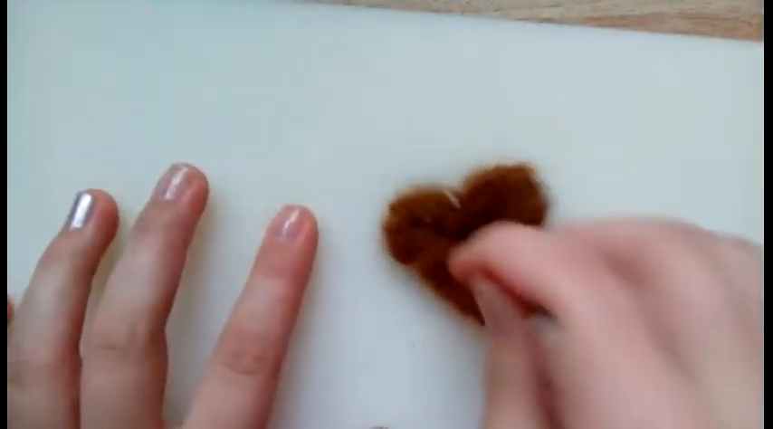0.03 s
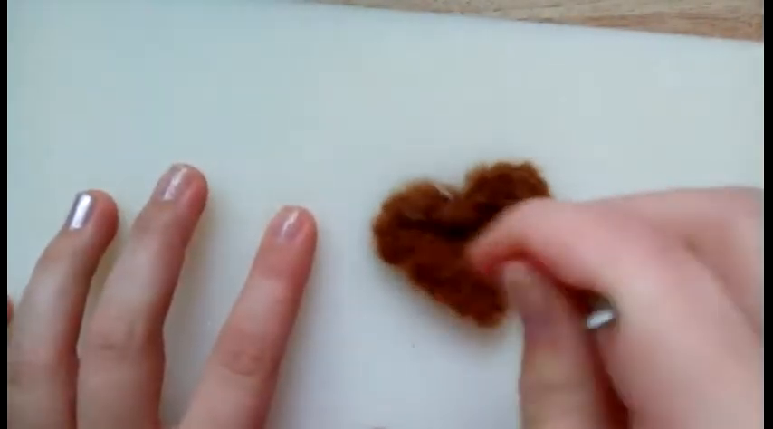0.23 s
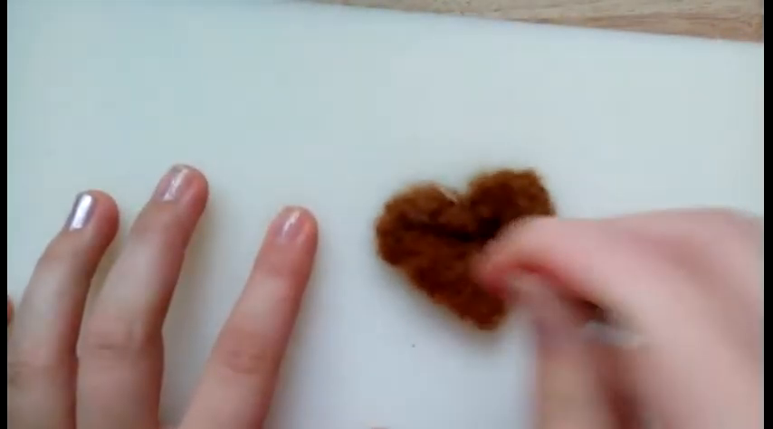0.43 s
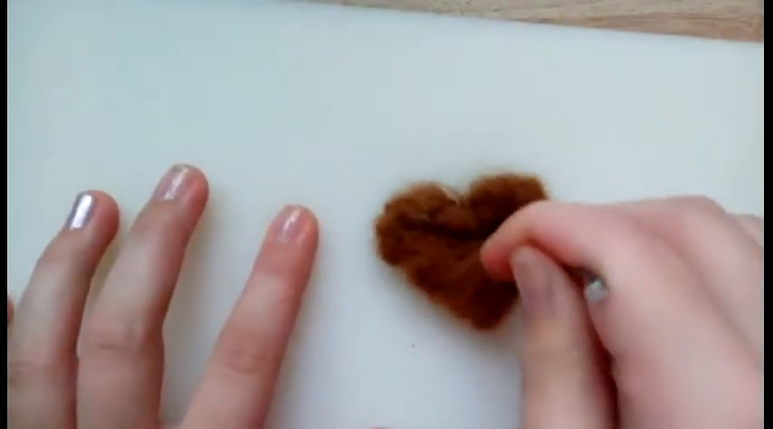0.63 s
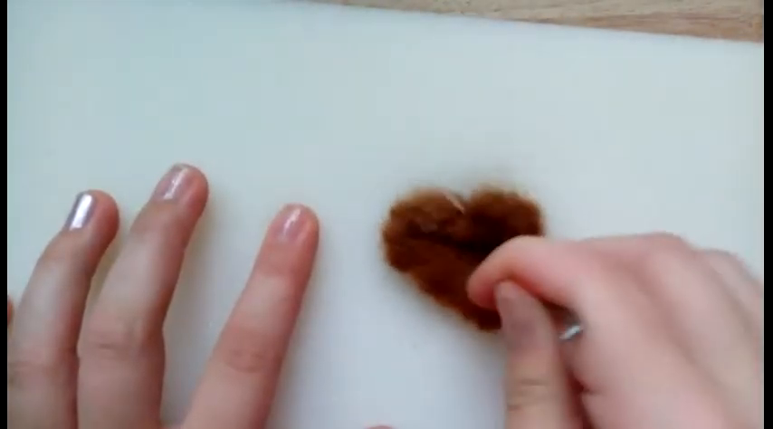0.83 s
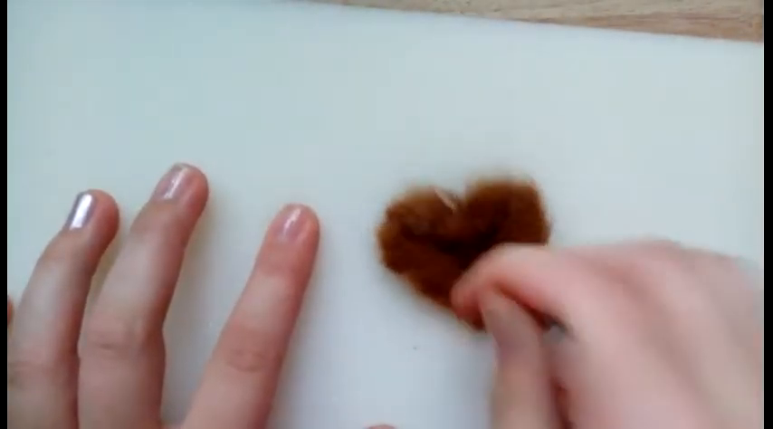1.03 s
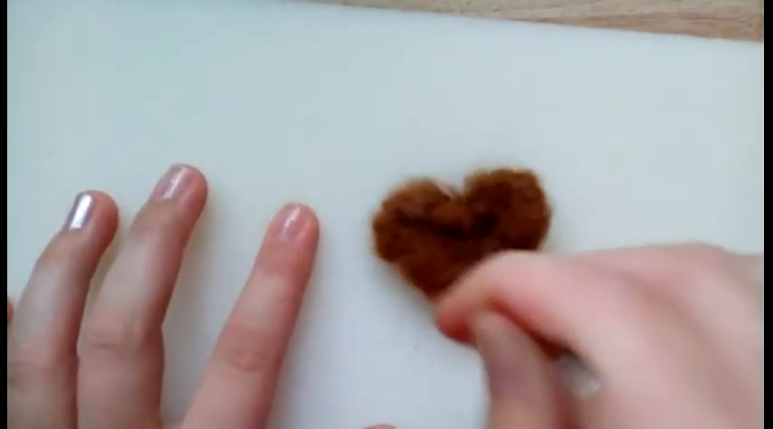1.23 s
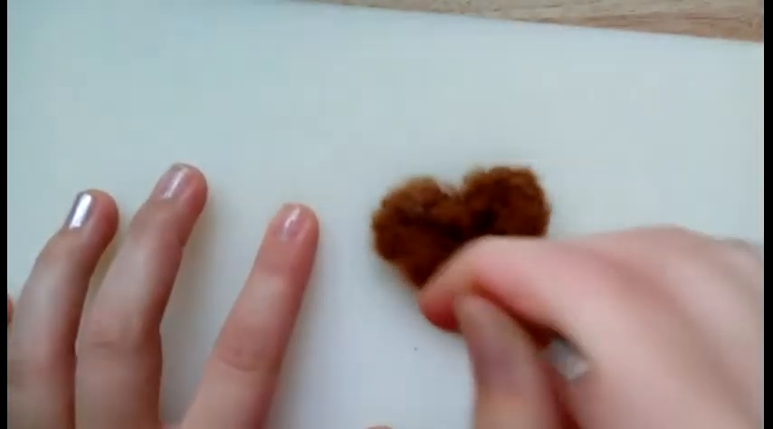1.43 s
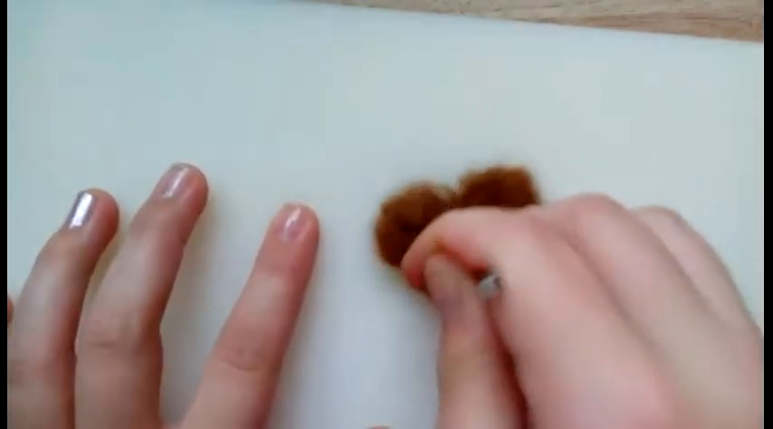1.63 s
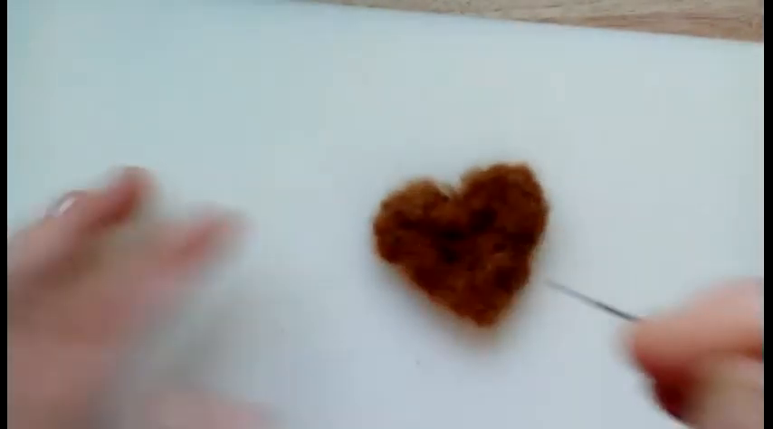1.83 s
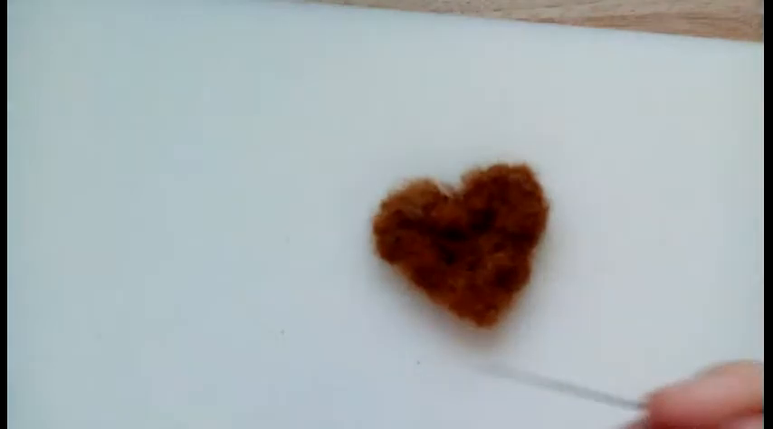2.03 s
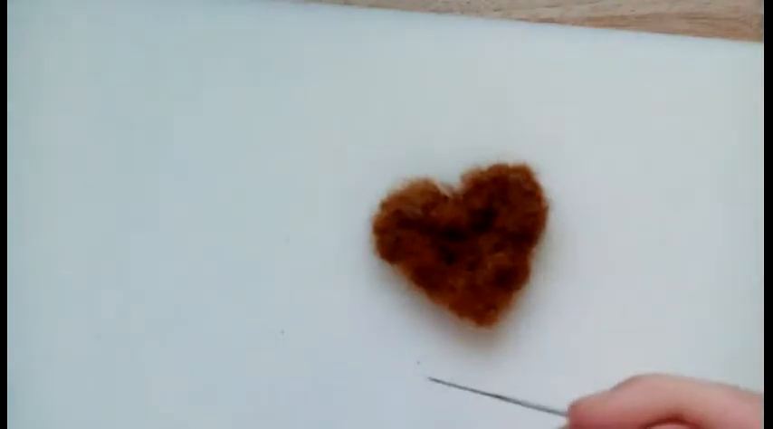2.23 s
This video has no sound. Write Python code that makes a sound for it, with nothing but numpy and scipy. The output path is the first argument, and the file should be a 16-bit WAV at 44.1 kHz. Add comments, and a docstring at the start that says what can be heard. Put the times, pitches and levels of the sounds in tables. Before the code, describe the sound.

A felting needle stabs wool on a foam pad about four times a second, eight crunchy blows with deep table thumps, faint rasps between as it pulls out, then quiet; close microphone, small quiet room with hiss.

```python
"""A barbed felting needle stabs four times a second through wool into a foam pad on a table, miked close.
Each stab rustles as swelling noise in the wool and crunches as ringing foam grains and clicks in the pad.
Decaying modes thump the table; grains rasp on the way out, with pings as the tip springs free.
A short room answer, a quiet room's murmur and microphone hiss lie around it; the hardest blows clip."""
import sys
import numpy as np
from scipy import signal
from scipy.fft import rfft, irfft, next_fast_len
from scipy.io import wavfile
from scipy.ndimage import map_coordinates

SR = 44100
rng = np.random.default_rng(int(sys.argv[2]) if len(sys.argv) > 2 else 0)


def put_to_file(sound):
    """Save the sound as 16-bit audio at rate SR, in the file named by the first command-line argument."""
    columns = np.atleast_2d(sound).T  # one column per channel
    safe = np.clip(columns, -1, 1)
    whole_steps = np.round(safe * 32767)
    wavfile.write(sys.argv[1], SR, whole_steps.astype(np.int16))


N = 100283
T = np.arange(N) / SR

# strokes through wool into foam: (time [s], length [s], crunch level [dB], change over the stroke [dB],
# wool level [dB], rise of the crunch [s], treble gain [dB], room answer [dB])
STABS = [(-.012, 0.066, -20, -24, -16.5, 0.0018, 3, -7), (0.318, 0.036, -19, -3.5, -21.5, .004, -6, -11),
         (0.561, 0.038, -19.5, -4.5, -21.5, 0.00063, 1, -12),
         (0.816, 0.031, -16.5, -13, -14, 0.0063, 0.1, -9.5),
         (1.077, 0.02, -23.5, -5, -14.5, 0.0009, 3, -11),
         (1.318, 0.027, -14, -4.5, -20.5, 0.0044, -4.2, -11.5),
         (1.566, 0.032, -20.5, -8, -19.5, 0.0061, -0.5, -11),
         (1.805, 0.036, -19, -13.5, -19.5, 0.0009, -3.5, -8.5)]

SWAY_T60_S, SWAY_RISE_S = 0.14, 0.0033
BOOM_HZ, BOOM_T60_S, BOOM_RISE_S = 157.5, 0.097, 0.0059
WIDE_FROM_HZ = 4300  # left and right differ only above this


def amp(db):
    """dB to gain."""
    return 10 ** (np.asarray(db) / 20)


def unit(x):
    """Scaled to rms 1."""
    return x / np.sqrt(np.mean(x ** 2) + 1e-20)


def along(points, hz):
    """Values of (frequency [Hz], value) points, interpolated on a log frequency axis."""
    f, v = np.transpose(points)
    return np.interp(np.log(hz + 1), np.log(f + 1), v)


def filtered(x, response):
    """x times a complex response of frequency."""
    m = next_fast_len(N + SR // 2)
    return irfft(rfft(x, m) * response(np.fft.rfftfreq(m, 1 / SR)), m)[..., :N]


def keeping(x, response):
    """Filtered so that white noise keeps its rms."""
    def levelled(hz):
        gain = response(hz)
        return gain / np.sqrt(np.mean(np.abs(gain) ** 2))
    return filtered(x, levelled)


def coloured(x, spectrum):
    """x with a (frequency [Hz], level [dB]) colour, rms 1."""
    return unit(filtered(x, lambda hz: amp(along(spectrum, hz))))


def stroke(start, length, tilt_db, rise, fall):
    """Envelope: exponential rise up to the start, sloping hold, exponential release."""
    t = T - start
    hold = amp(tilt_db * np.clip(t / length, 0, 1))
    return hold * np.exp(np.minimum(t, 0) / rise) * np.exp(-np.maximum(t - length, 0) / fall)


def burst(s, db, rise, fall):
    """Envelope of a click."""
    return amp(db) * stroke(s, 0.0002, 0, rise, fall)


def ring(start, hz, t60, rise, sag=0):
    """One decaying mode, first swinging down; sag is the share by which it starts above its pitch."""
    sag_s = 0.013
    out, first = np.zeros(N), max(int(start * SR) + 1, 0)
    t = T[first:first + int(t60 * SR)] - start
    turns = hz * (t + sag * sag_s * (1 - np.exp(-t / sag_s)))
    out[first:first + len(t)] = -np.sin(2 * np.pi * turns) * amp(-60 * t / t60) * (1 - np.exp(-t / rise))
    return out


def grains(envelope, rate, spread_db, clump_db, cycles, fine):
    """Short pings of scattered pitch and uneven size over a fine hiss, both in clumps under the envelope."""
    # a smooth random level in dB, with a new point every 150 samples
    knots = rng.standard_normal(N // 150 + 4)
    wander = map_coordinates(knots, [np.arange(N) / 150])
    clumped = envelope * unit(amp(clump_db * wander))

    when, pitch, luck = rng.random((int(rate * N / SR), 3)).T
    at, hz = (when * N).astype(int), 300 + 14500 * pitch
    size = amp(-spread_db * np.log(luck + 0.0099)) * np.sqrt(hz)
    size /= np.sqrt(np.sum(size ** 2 * cycles / hz) * SR / (4 * N))  # the pings add up to about rms 1

    keep = envelope[at] > amp(-60)  # leave out pings too faint to hear
    step = np.arange(200)
    turns = np.outer(hz[keep], step / SR)
    ping = (size * clumped[at])[keep, None] * np.sin(2 * np.pi * turns) * np.exp(-turns / cycles)
    pings = np.bincount((at[keep, None] + step).ravel(), ping.ravel(), N + 200)[:N]
    hiss = clumped * rng.standard_normal(N)
    return np.sqrt(1 - fine) * pings + np.sqrt(fine) * hiss


def wool():
    """The tip rustles through wool: coloured noise swelling ahead of each stab and dying after it."""
    # colour of the rustle: (frequency [Hz], level [dB])
    wool_colour = [(200, 3), (800, -7), (2000, -20.5), (5000, -25), (12000, -28)]
    envelope = sum(amp(row[4]) * stroke(row[0], 0.0021, 0, rise=0.0095, fall=0.011) for row in STABS)
    return envelope * coloured(rng.standard_normal(N), wool_colour)


def pad(f):
    """Response of pad and table: resonances of alternating sign added together."""
    # (centre [Hz], width [Hz], level [dB])
    modes = [(250, 76, 5.5), (429, 178, 3.5), (550, 197, 3), (613, 40, 5), (773, 152, 2.5),
             (1454, 193, 1.5), (2166, 550, -4.5), (3280, 960, -6.5), (4300, 345, -1.5), (4780, 430, -4.5),
             (5710, 920, -8.5), (7060, 1020, -8.5), (9300, 3440, -13)]
    return sum((-1) ** k * amp(db) * 1j * f * width / (centre ** 2 - f ** 2 + 1j * f * width)
               for k, (centre, width, db) in enumerate(modes))


def tearing(foam, clicks):
    """Torn cells ring for a few cycles at their own pitch, some snap loudly; the pad colours both."""
    torn = grains(foam, rate=11000, spread_db=3, clump_db=1.5, cycles=7, fine=0.35)
    # snaps are dull above 6100 Hz
    snapped = filtered(clicks * rng.standard_normal(N), lambda hz: 1 / (1 + 1j * hz / 6100) ** 2)
    return keeping(torn + snapped, pad)


def crunch():
    """Barbs tear through foam cells, brighter or duller from stab to stab. Returns (middle, side)."""
    # single foam cells that snap loudly: (time [s], level [dB])
    snaps = [(.004, -13), (.028, -24), (0.343, -10.5), (0.565, -12), (0.571, -10), (0.579, -12),
             (0.593, -17), (0.819, -6), (0.828, -12), (1.076, -7.5), (1.083, -8), (1.096, -14),
             (1.345, -37), (1.572, -7.5), (1.586, -22), (1.811, -11)]
    treble_hz, spread_db = 5800, -14
    foam = sum(amp(db) * stroke(s, length, change, bite, fall=0.0035)
               for s, length, db, change, _, bite, *_ in STABS)
    clicks = sum(burst(s, db, rise=0.0003, fall=0.0013) for s, db in snaps)
    tear, wide = tearing(foam, clicks), tearing(foam, clicks)

    bright = amp(np.interp(T, [row[0] for row in STABS], [row[6] for row in STABS]))
    treble = filtered(tear, lambda hz: 1 / (1 + (treble_hz / (hz + 1)) ** 4))
    side = amp(spread_db) * bright * filtered(wide, lambda hz: hz > WIDE_FROM_HZ)
    return tear + (bright - 1) * treble, side


def room(x):
    """Each frequency of the room's answer dies at its own speed; a new noise tail for every stab."""
    # decay of the room: (frequency [Hz], t60 [s])
    decay = [(100, 1), (400, 0.43), (1500, 0.37), (5000, 0.19), (12000, 0.45)]
    out = np.zeros(N)
    # each stab's stretch begins 2000 samples ahead of it, to take in the wool
    edges = [0] + [round(s * SR) - 2000 for s, *_ in STABS[1:]] + [N]
    for a, b, row in zip(edges, edges[1:], STABS):
        hz, t, z = signal.stft(rng.standard_normal(SR // 2), SR, nperseg=256)
        fade = amp(-60 * t / along(decay, hz)[:, None])
        tail = signal.istft(z * fade, SR, nperseg=256)[1]
        wet = signal.fftconvolve(x[a:b], tail / np.linalg.norm(tail))[:N - a]
        out[a:a + len(wet)] += amp(row[7]) * wet
    return out


def floor():
    """Room murmur and microphone hiss as coloured noise; only the treble differs between the sides."""
    # murmur and hiss in the middle: (frequency [Hz], level per Hz [dB])
    floor_colour = [(15, -43), (25, 16), (175, 3), (240, 3.5), (290, -0.5), (960, -4), (1040, -6),
                    (3730, -10.5), (4620, -14.5), (13400, -3), (14500, -5.5)]
    # hiss that differs left to right: (frequency [Hz], level per Hz [dB])
    wide_colour = [(2470, -50), (4200, -15.5), (11400, -7), (14500, -6)]
    mid_db, side_db = -38, -43
    mid = amp(mid_db) * coloured(rng.standard_normal(N), floor_colour)
    hiss = filtered(rng.standard_normal(N), lambda hz: amp(along(wide_colour, hz)) * (hz > WIDE_FROM_HZ))
    side = amp(side_db) * unit(hiss)
    return np.array([mid + side, mid - side])


def boom(s, db):
    """The table top's main mode."""
    return amp(db) * ring(s, BOOM_HZ, BOOM_T60_S, BOOM_RISE_S)


def thumps():
    """The hand bottoms out: modes of the table sway slowly, boom, hum, knock and rap."""
    # (time [s], sway lag [s], settled sway pitch [Hz], sway level [dB], boom level [dB], hum level [dB],
    # knock pitch [Hz], knock level [dB], rap level [dB])
    blows = [(.003, 0.014, 74, -23, -18.5, -54, 397, -50, -57),
             (.320, 0.0046, 86, -12, -7.5, -18, 312, -13, -21),
             (0.567, 0.0045, 78.6, -8, -0.5, -26, 390, -6.5, -16.5),
             (0.8159, 0.0068, 68.3, -6, -1.5, -25.5, 356, -3, -20),
             (1.074, 0.014, 69.4, -11, 3, -8, 396, 0.5, -4.5),
             (1.319, 0.0181, 69, -11.5, -12.5, -35, 353, -11, -26),
             (1.573, 0.0067, 86.2, -4.5, -1.5, -25, 312, -7, -13.5),
             (1.805, 0.0032, 64.3, -4, -9.5, -20, 394.4, 3, -4.5)]
    # what the table keeps ringing with: (frequency [Hz], level against the sway [dB], t60 [s])
    shiver_modes = [(64.7, -35.5, 1), (81.8, -18, 0.63)]
    # (frequency [Hz], level within the rap [dB], t60 [s])
    rap_modes = [(581, -7.5, 0.065), (635, -3.5, 0.067), (763, 5.5, 0.023), (858, 1, 0.025),
                 (955, -8.5, 0.047), (1274, -7.5, 0.015)]
    hum_hz, hum_t60_s = 267.8, 0.17
    knock_t60_s, knock_rise_s = 0.047, 0.0011
    low, knock, rap = np.zeros((3, N))
    for s, lag, hz, sway_db, boom_db, hum_db, knock_hz, knock_db, rap_db in blows:
        sway = ring(s + lag, hz, SWAY_T60_S, SWAY_RISE_S, sag=0.2)
        shiver = sum(amp(db) * ring(s + lag, f, t60, SWAY_RISE_S) for f, db, t60 in shiver_modes)
        low -= amp(sway_db) * (sway + shiver)
        low += boom(s, boom_db)
        low += amp(hum_db) * ring(s, hum_hz, hum_t60_s, BOOM_RISE_S)
        knock += amp(knock_db) * ring(s, knock_hz, knock_t60_s, knock_rise_s)
        rap += amp(rap_db) * sum(amp(db) * ring(s, f, t60, knock_rise_s) for f, db, t60 in rap_modes)
    return low, knock, rap


def rasp():
    """Barbs drag on the way out: coloured grains, rising or falling in level over each pull."""
    # pulling out: (start [s], end [s], level [dB], change towards the end [dB])
    drags = [(0.118, 0.178, -35, 1), (0.407, 0.463, -31, -7.5), (0.61, 0.696, -39.5, -6.5),
             (0.875, 0.974, -45, 7.5), (1.144, 1.185, -36, -6.5), (1.345, 1.461, -39, 0),
             (1.626, 1.698, -40.5, 5), (1.843, 1.957, -40.5, 3.5)]
    # colour of the rasp: (frequency [Hz], level [dB])
    rasp_colour = [(300, 7), (1000, 3), (1800, 0), (2700, 3), (3600, -2.5), (4400, -2.5), (6500, -7),
                   (12000, -32)]
    drag = sum(amp(db) * stroke(a, b - a, change, rise=0.021, fall=0.0098) for a, b, db, change in drags)
    scrape = grains(drag, rate=11000, spread_db=2.2, clump_db=0.7, cycles=9, fine=0.5)
    return keeping(scrape, lambda hz: amp(along(rasp_colour, hz)))


def jolts():
    """The table shakes as the needle lets go: its boom and a 73 Hz sway."""
    # (time [s], sway level [dB], boom level [dB])
    releases = [(0.167, -29.5, -27), (0.473, -40, -27), (0.691, -41, -24), (0.957, -27, -18.5),
                (1.169, -39, -22.5), (1.929, -32, -29), (1.442, -51, -21.5), (1.685, -33, -24.5)]
    return sum(boom(s, boom_db) + amp(sway_db) * ring(s, 73, SWAY_T60_S, SWAY_RISE_S)
               for s, sway_db, boom_db in releases)


def ticks():
    """The tip springs free with two short pings; a dull pop of the foam follows."""
    # (time [s], high ping [Hz], its level [dB], low ping [Hz], its level [dB], pop level [dB])
    springs = [(.9653, 3800, -20, 1500, -24, -15), (1.4517, 5300, -19, 2900, -21, -20),
               (1.6903, 4700, -21, 2800, -18, -21), (1.951, 4300, -30, 2800, -30, -34)]
    ping_t60_s, rise_s = 0.007, 0.0004
    pop_hz, pop_lag_s, pop_t60_s = 1000, 0.0019, 0.008
    out = np.zeros(N)
    for s, high_hz, high_db, low_hz, low_db, pop_db in springs:
        out += amp(high_db) * ring(s, high_hz, ping_t60_s, rise_s)
        out += amp(low_db) * ring(s, low_hz, ping_t60_s, rise_s)
        out += amp(pop_db) * ring(s + pop_lag_s, pop_hz, pop_t60_s, rise_s)
    return out


def scene():
    """Needle and table in the middle with some treble spread, over the floor."""
    tear, side = crunch()
    stab = wool() + tear
    low, knock, rap = thumps()
    wet = room(stab + rap + amp(-6) * knock)  # the room answers the knock less than the crunch
    middle = stab + low + knock + rap + rasp() + jolts() + ticks() + wet
    return middle + np.outer([1, -1], side) + floor()


def record(dry):
    """A small microphone loses the deep bass; the recorder clips at full scale and is band-limited."""
    bass_cut_hz, top_hz = 36.4, 14300
    clip_hard = 9.3  # the higher, the sharper the knee

    def bass_cut(hz):
        second_order = -hz ** 2 / (bass_cut_hz ** 2 - hz ** 2 + 1j * np.sqrt(2) * hz * bass_cut_hz)
        return second_order ** 2

    thin = filtered(dry, bass_cut)
    clipped = thin / (1 + np.abs(thin) ** clip_hard) ** (1 / clip_hard)
    return filtered(clipped, lambda hz: hz < top_hz)


dry = scene()
out = record(dry)
put_to_file(out)
```